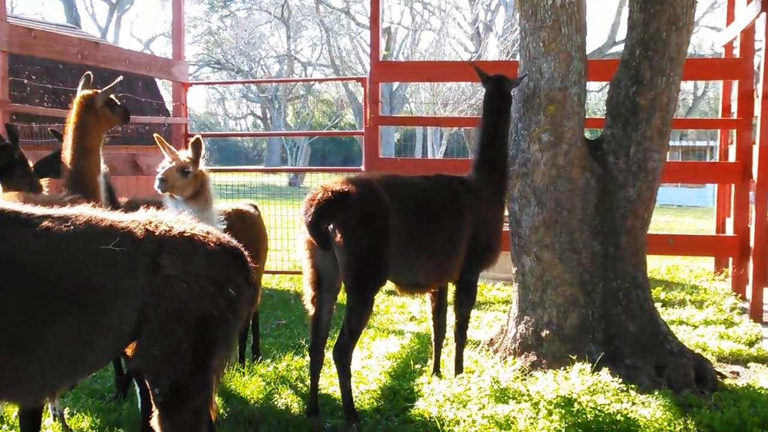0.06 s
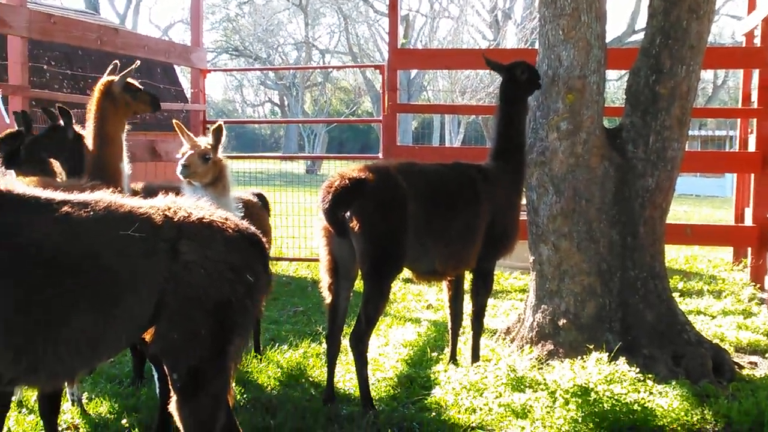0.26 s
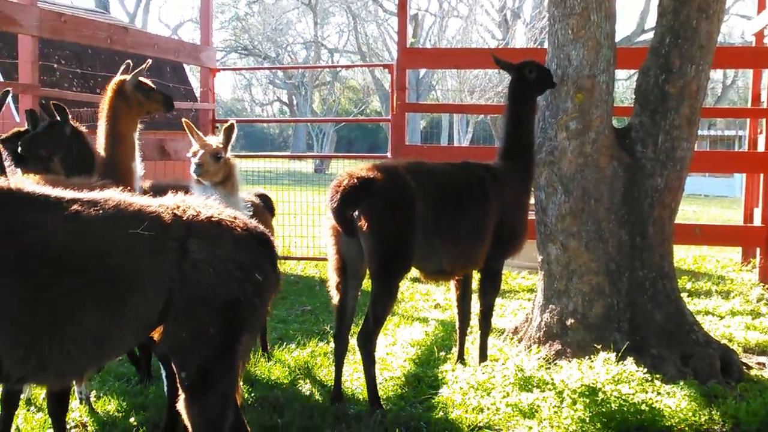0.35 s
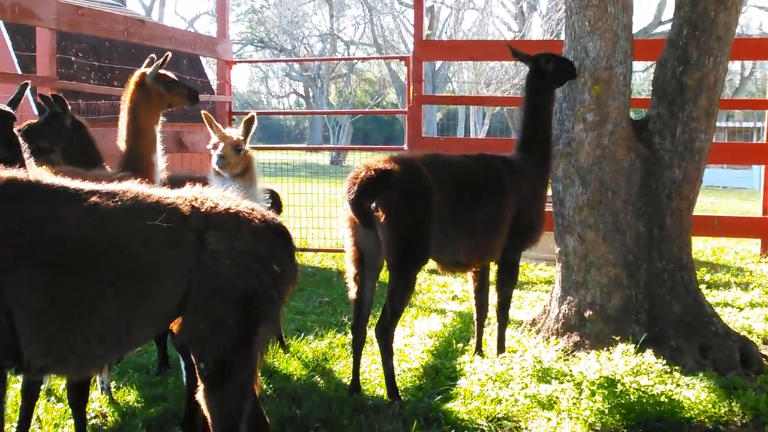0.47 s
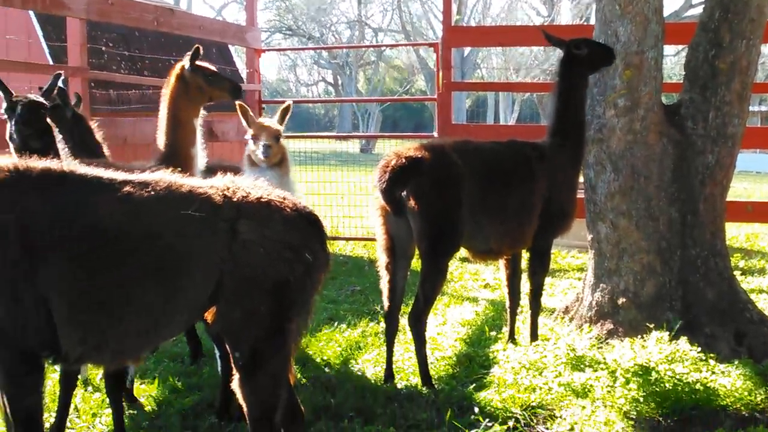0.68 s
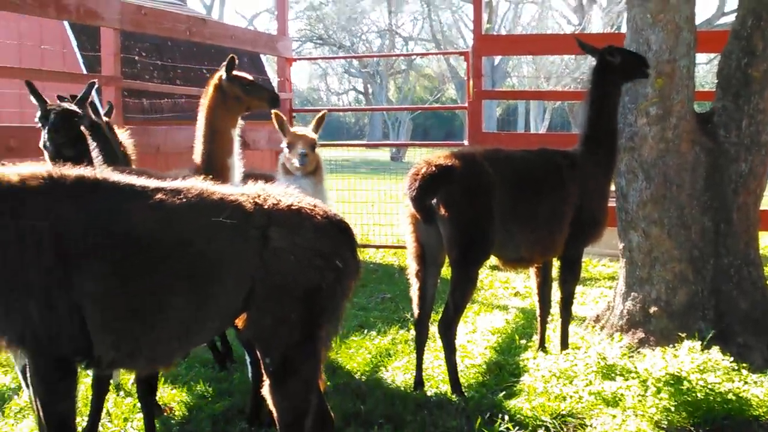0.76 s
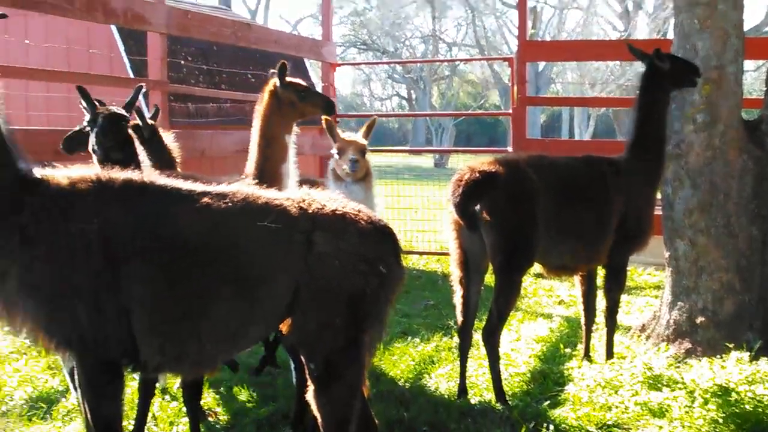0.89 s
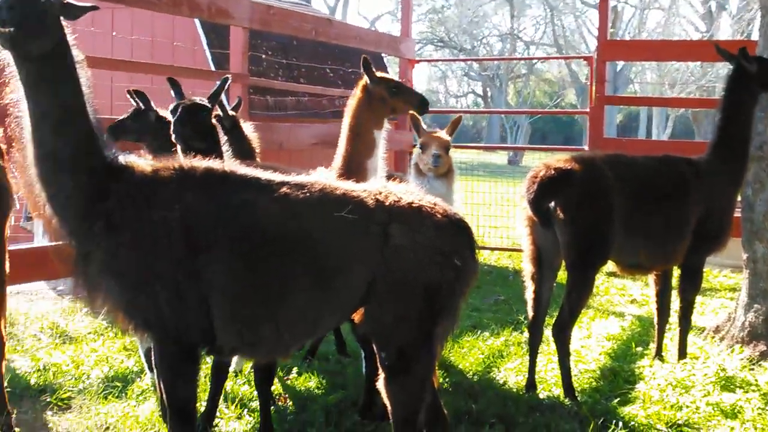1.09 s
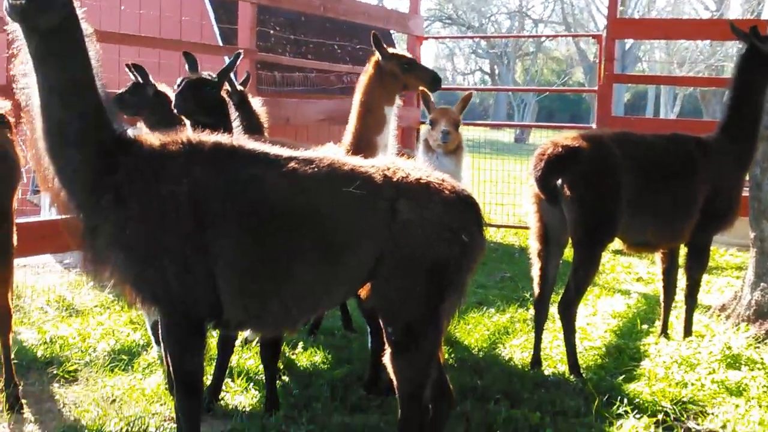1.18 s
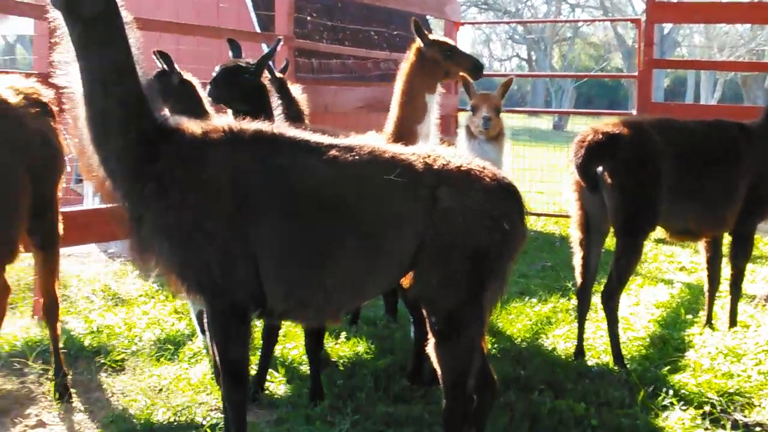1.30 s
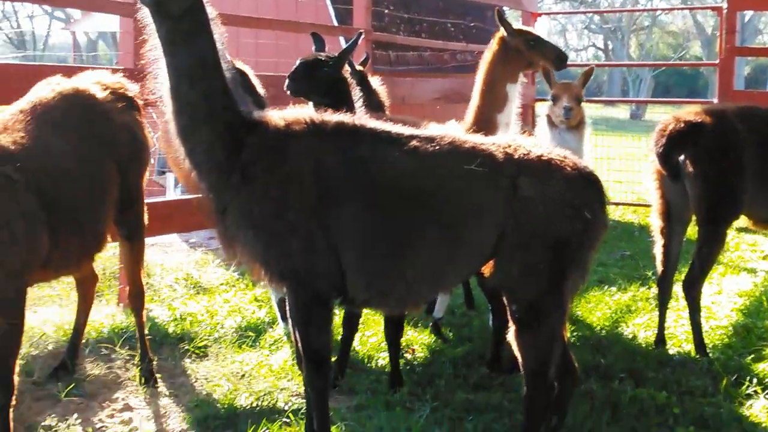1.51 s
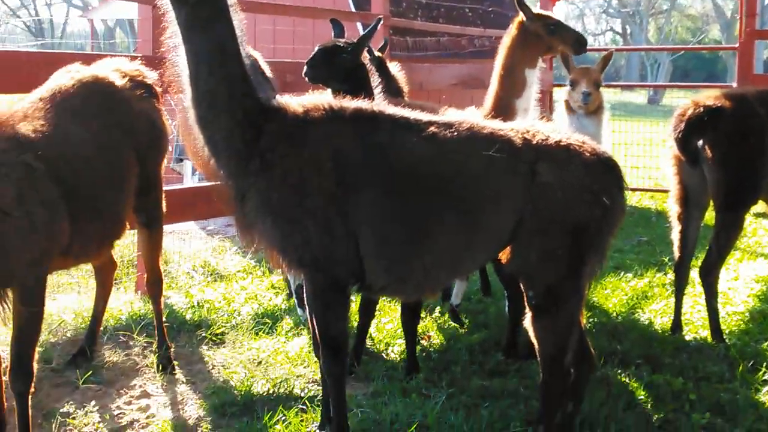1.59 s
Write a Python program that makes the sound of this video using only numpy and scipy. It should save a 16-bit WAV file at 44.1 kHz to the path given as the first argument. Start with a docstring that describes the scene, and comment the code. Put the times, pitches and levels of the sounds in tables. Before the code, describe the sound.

Light wind rumbles on the microphone, swelling into a short, thumping gust from about 0.2 to 0.5 seconds, then easing. Llamas shift faintly in the grass, with a soft hoof crunch around 0.8 seconds and a swish near 1.3, where a distant bird is barely audible. Dry stalks tick at about 0.5 and 1.6 seconds. A thin hiss of leaves lies underneath throughout.

```python
"""Light wind rumbles on the microphone, and one short gust buffets it: turbulent air
presses on the diaphragm. Llamas stand and graze in a quiet sunny pasture. Grass swishes by
friction, hooves crunch softly as grit slips, and a few dry stalks tick as they snap.
A faint call comes from far off, over distant air and the thin hiss of leaves."""
import sys
import numpy as np
from scipy import signal
from scipy.fft import rfft, irfft
from scipy.io import wavfile

SR = 44100
rng = np.random.default_rng(int(sys.argv[2]) if len(sys.argv) > 2 else 0)


def transcribe(u):
    """Save the signal u as a 16-bit wav file named by the first command-line argument.

    u: samples, shape (n,) or (channels, n), limited to [-1, 1]; the rate is SR.
    q: integer samples, one column per channel.
    """
    v = np.clip(np.atleast_2d(u).T, -1, 1)
    q = np.round(v * 32767).astype(np.int16)
    wavfile.write(sys.argv[1], SR, q)


N = 72765
TIME = np.arange(N) / SR
BIN_HZ = np.fft.rfftfreq(N, 1 / SR)


def wind():
    """Turbulent pressure on the microphone: a deep rumble, a flutter and one brighter gust."""
    # strength of the breeze and of the gust: time_s, level_db
    breeze_levels = [(0, -56), (.086, -49), (.12, -51), (.2, -48.5), (.45, -47.5), (.56, -47.5),
                     (.6, -60.5), (.655, -49.5), (.69, -68), (.735, -52.5), (.8, -67), (.85, -54.5),
                     (.89, -58), (.965, -53), (1.08, -58), (1.15, -62), (1.33, -56), (1.45, -60.5),
                     (1.65, -58.5)]
    gust_levels = [(.09, -88.5), (.14, -61.5), (.205, -63.5), (.23, -39), (.27, -36.5), (.315, -33.5),
                   (.37, -37.5), (.412, -31), (.432, -36), (.446, -56), (.47, -100)]
    # spectra of the pressure fluctuations: frequency_hz, gain_db
    rumble_spectrum = [(12, -65), (24, -44), (35, -17.5), (52, 4.5), (72, 6), (95, 2.5), (125, -18),
                       (160, -33), (220, -53.5), (400, -74)]
    flutter_spectrum = [(20, -51), (50, -23), (100, -3), (150, 9.5), (200, -12), (280, -26.5), (450, -65),
                        (900, -75)]
    gust_spectrum = [(12, -72), (28, -46), (50, -9), (85, 10), (190, -0.5), (300, -10.5), (450, -19.5),
                     (620, -30.5), (1000, -49.5), (2000, -62)]
    breeze = level(breeze_levels)
    flutter_gain = amp(-56.5) * (breeze / amp(-48.5)) ** 2.35  # grows faster than the rumble
    flutter = flutter_gain * turbulence(flutter_spectrum, span_s=0.1)
    gust = level(gust_levels) * turbulence(gust_spectrum, span_s=0.078)
    rumble = breeze * turbulence(rumble_spectrum, span_s=0.044)
    return rumble + flutter + gust


def eddies():
    """Pressure is low inside a vortex, so each eddy thumps the microphone as it passes."""
    # passing eddies: time_s, level_db, half_width_s
    passes = [(.083, -41, 0.0017), (0.239, -31, 0.0014), (.26, -30.5, 0.00076), (0.305, -27, 0.00093),
              (0.318, -28.5, 0.00095), (.336, -27.5, 0.0013), (0.402, -20.5, 0.0017),
              (0.412, -23.5, 0.0027), (.429, -33.5, 0.00071), (.487, -29, 0.0013), (0.718, -40, 0.0027),
              (0.732, -41.5, 0.0032), (0.972, -40, 0.0034), (1.645, -46.5, 0.0019)]
    core_db, core_share = -24, 0.36  # a narrower dip steepens the middle
    port_hz = 51  # the microphone loses the bass below this
    pressure = sum(dip(s, db, width_s) + dip(s, db + core_db, width_s * core_share)
                   for s, db, width_s in passes)
    return signal.lfilter(*signal.butter(2, port_hz, "high", fs=SR), pressure)


def grass():
    """Sliding friction: blades rub in many tiny contacts as the animals shift."""
    # swishes, and a duller brushing under the gust: peak_s, level_db, rise_s, fall_s
    swishes = [(.07, -68.5, 0.026, .05), (0.216, -68, 0.0098, 0.051), (0.662, -61, 0.056, 0.023),
               (.79, -61.5, 0.047, 0.034), (0.991, -65, 0.1, 0.083), (1.325, -54.5, 0.021, 0.064),
               (1.56, -62.5, 0.057, .04)]
    brushes = [(.29, -65, 0.0067, 0.015), (0.331, -67.5, 0.023, 0.016), (0.363, -61.5, 0.015, 0.02)]
    # spectra of the rubbing blades: frequency_hz, gain_db
    swish_spectrum = [(120, -24), (250, -8), (380, -12), (540, -25), (750, -9), (1200, -21.5), (1700, -16),
                      (3000, -16.5), (5000, -13), (7500, 1.5), (9000, -3.5), (11000, -8.5), (15500, -8)]
    brush_spectrum = [(1000, -32), (2800, -15), (4500, -3), (7500, 0.5), (9500, -2.5), (11500, -24),
                      (15500, -33)]
    swish = sum(swell(*row) for row in swishes) * grains(swish_spectrum, per_s=42000, spread_db=-0.3)
    brush = sum(swell(*row) for row in brushes) * grains(brush_spectrum, per_s=9000, spread_db=2.0)
    return swish + brush


def hoof():
    """Stick-slip: grit gives way under a hoof in small slips, some duller, some brighter."""
    # slips of the grit: start_s, level_db, decay_s, treble_db
    slips = [(0.526, -70, 0.0086, 3.5), (0.667, -74, 0.0085, 10), (0.698, -56.5, 0.0021, -3.5),
             (.785, -55, 0.0042, -1), (0.791, -61, 0.023, -7), (.81, -55.5, 0.0018, 0.5),
             (.817, -60, .006, -5), (0.829, -58.5, 0.0059, -1.5), (0.835, -53, 0.0016, 2),
             (.85, -58.5, 0.0037, 2.5), (1.632, -67, 0.023, -10)]
    # spectrum of crushed grit: frequency_hz, gain_db
    grit_spectrum = [(150, -12), (320, -2), (500, -1), (900, 3.5), (1150, -10), (1400, -11.5), (2250, -4),
                     (2750, -9.5), (3300, -2.5), (4300, -21.5), (7000, -31)]
    split_hz, rise_s = 2100, 0.001
    grit = turbulence(grit_spectrum, span_s=0.0022)
    body = irfft(rfft(grit) / (1 + (BIN_HZ / split_hz) ** 6), N)
    treble = grit - body
    return sum(amp(db) * burst(s, rise_s, decay_s) * (body + amp(treble_db) * treble)
               for s, db, decay_s, treble_db in slips)


def stalks():
    """Brittle fracture: each dry stalk rings for about a cycle, heavily damped, with a short fizz."""
    # snapping stalks: start_s, level_db
    snaps = [(.4615, -39), (.471, -46), (.801, -50), (1.566, -44), (1.589, -44)]
    # spectrum of the fizz: frequency_hz, gain_db
    fizz_spectrum = [(1500, -33), (4000, -4), (8000, 15), (12000, -19), (15500, -13)]
    ring_hz, ring_decay_s, fizz_db = 9000, 0.00009, -14
    rings = fizz_gain = 0
    for s, db in snaps:
        age = np.maximum(TIME - s, 0)
        rings += amp(db) * np.exp(-age / ring_decay_s) * np.sin(2 * np.pi * ring_hz * age)
        fizz_gain += amp(db + fizz_db) * burst(s, rise_s=0.00013, decay_s=0.0035)
    return rings + fizz_gain * colour(rng.standard_normal(N), fizz_spectrum)


def far_call():
    """Frequency modulation: a thin tone, likely a distant bird, wavers and sags over two notes."""
    # notes of the call: peak_s, level_db, rise_s, fall_s
    notes = [(1.303, -74.5, .005, 0.017), (1.378, -73.5, .012, 0.015)]
    pitch_hz, sag_hz_per_s, waver_hz = 1780, 900, 45.6
    hz = pitch_hz - sag_hz_per_s * (TIME - notes[0][0]) + waver_hz * drift(rate_hz=150)
    return sum(swell(*row) for row in notes) * np.sin(2 * np.pi * np.cumsum(hz) / SR)


def air_and_leaves():
    """Broadband noise: far air swells slightly beneath the faintly flickering hiss of leaves."""
    # strength of the far air: time_s, level_db
    air_levels = [(0, -71.5), (.6, -71.5), (1.65, -69)]
    # spectra of air and leaves: frequency_hz, gain_db
    air_spectrum = [(30, -6), (150, 2.5), (350, 2.5), (560, -5), (850, 0), (1300, -5.5), (3000, -10),
                    (6000, -5), (15500, -10)]
    leaf_spectrum = [(2500, -40.5), (5000, -17.5), (6400, -10), (7500, 1.5), (7900, -3.5), (8500, -0.5),
                     (9300, -5), (10400, -5), (11000, -14.5), (15500, -11.5)]
    air = level(air_levels) * colour(rng.standard_normal(N), air_spectrum)
    leaf_db = -64.5 + 0.5 * drift(rate_hz=13)
    return air + amp(leaf_db) * colour(rng.standard_normal(N), leaf_spectrum)


def amp(db):
    """Amplitude ratio from decibels."""
    return 10 ** (np.asarray(db) / 20)


def unit(x):
    """Normalisation to rms 1."""
    return x / np.sqrt(np.mean(x ** 2) + 1e-20)


def level(points):
    """Amplitude envelope interpolated through (time_s, level_db) points."""
    return amp(np.interp(TIME, *np.transpose(points)))


def colour(x, spectrum):
    """Spectral shaping by (frequency_hz, gain_db) points, at rms 1."""
    hz, db = np.transpose(spectrum)
    gain = amp(np.interp(np.log(BIN_HZ + 1), np.log(hz), db))
    return unit(irfft(rfft(x) * gain, N))


def drift(rate_hz):
    """Random modulation: low-passed noise at rms 1."""
    return unit(irfft(rfft(rng.standard_normal(N)) / (1 + (BIN_HZ / rate_hz) ** 4), N))


def turbulence(spectrum, span_s):
    """Noise divided by its smoothed envelope stays even in strength over spans longer than span_s."""
    noise = colour(rng.standard_normal(N), spectrum)
    power = abs(signal.hilbert(noise)) ** 2
    smooth_power = irfft(rfft(power) * np.exp(-(BIN_HZ * span_s) ** 2), N)
    return unit(noise / np.sqrt(abs(smooth_power) + 1e-6))


def grains(spectrum, per_s, spread_db):
    """Shot noise: a dense stream of tiny contacts of uneven size."""
    size = amp(spread_db * np.minimum(rng.exponential(1, N), 4))
    contacts = rng.standard_normal(N) * size * (rng.random(N) < per_s / SR)
    return colour(contacts, spectrum)


def swell(peak_s, db, rise_s, fall_s):
    """Gaussian envelope with separate widths before and after its peak."""
    width_s = np.where(TIME < peak_s, rise_s, fall_s)
    return amp(db) * np.exp(-0.5 * ((TIME - peak_s) / width_s) ** 2)


def burst(start_s, rise_s, decay_s):
    """Transient envelope: linear rise, exponential decay."""
    age = np.maximum(TIME - start_s, 0)
    return np.minimum(age / rise_s, 1) * np.exp(-np.maximum(age - rise_s, 0) / decay_s)


def dip(time_s, db, width_s):
    """Pressure pulse: a short fall between two slight rises."""
    offset = (TIME - time_s) / width_s
    return -amp(db) * (1 - offset ** 2 / 2) * np.exp(-0.5 * offset ** 2)


def scene():
    """Superposition: all sources add at one microphone."""
    return (wind() + eddies() + air_and_leaves() + grass() + hoof() + stalks() + far_call())[None]


def record(dry):
    """Band limiting: the recorder cuts the lowest bass and the highest treble."""
    low_cut_hz, high_cut_hz = 18, 15750
    hz = np.fft.rfftfreq(2 * N, 1 / SR)
    rolloff = np.sqrt(1 + (low_cut_hz / (hz + 1)) ** 10)
    high_passed = irfft(rfft(dry, 2 * N) / rolloff)[:, :N]
    taps = signal.firwin(1023, high_cut_hz, window=("kaiser", 9), fs=SR)
    return signal.oaconvolve(high_passed, taps[None], "same")


dry = scene()
out = record(dry)
transcribe(out)
```